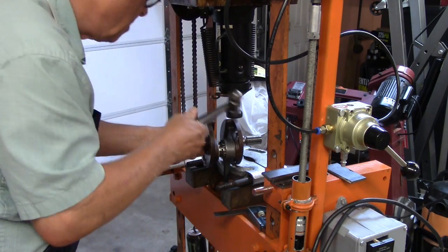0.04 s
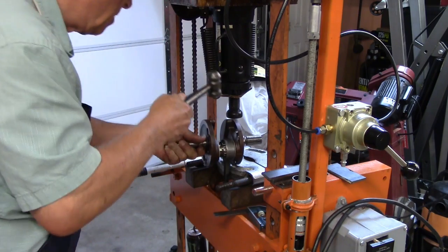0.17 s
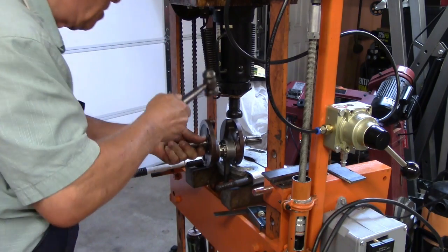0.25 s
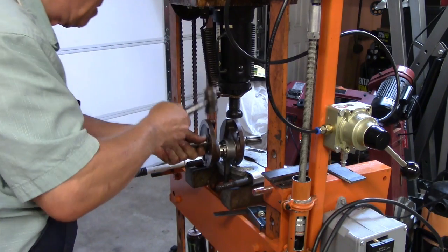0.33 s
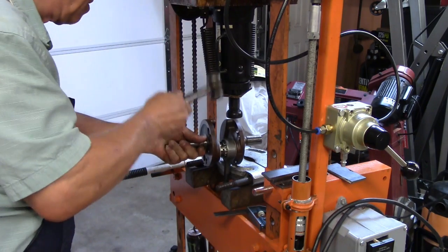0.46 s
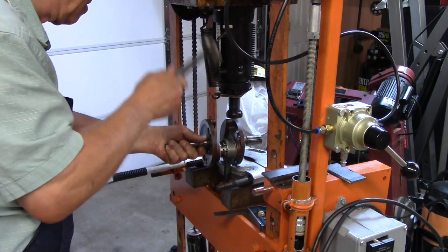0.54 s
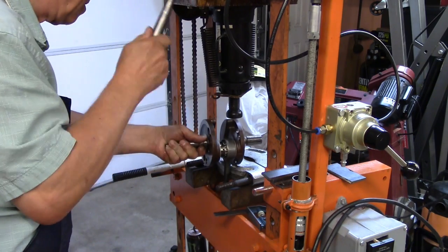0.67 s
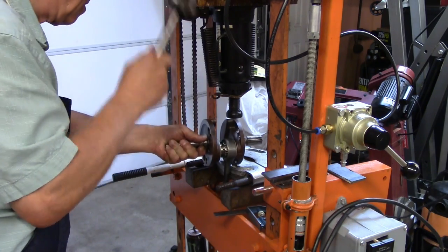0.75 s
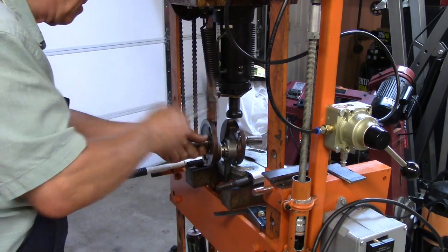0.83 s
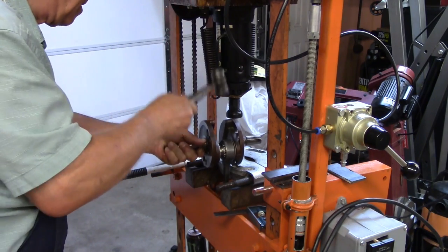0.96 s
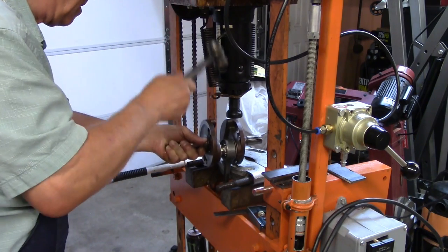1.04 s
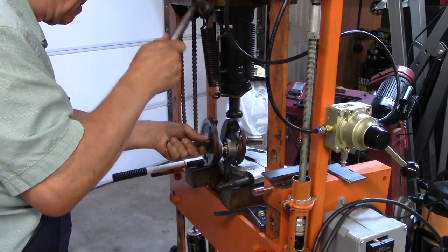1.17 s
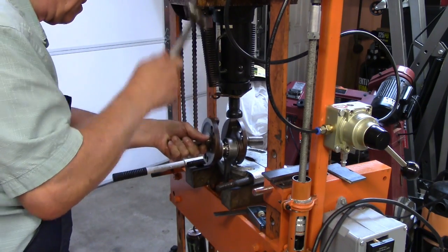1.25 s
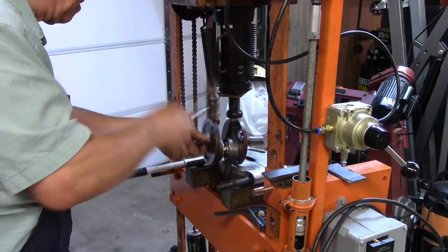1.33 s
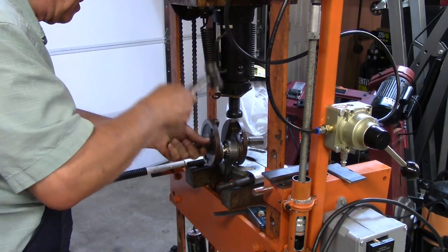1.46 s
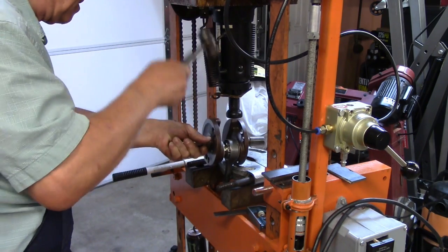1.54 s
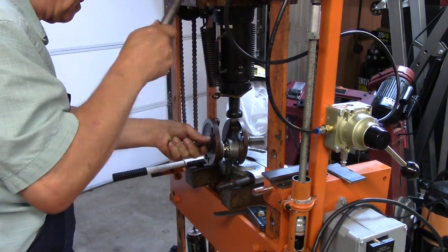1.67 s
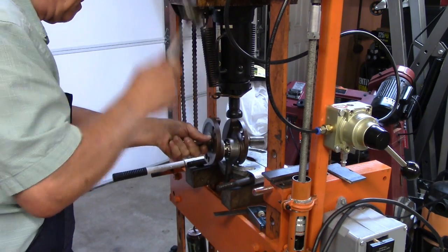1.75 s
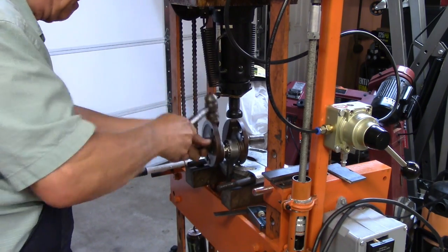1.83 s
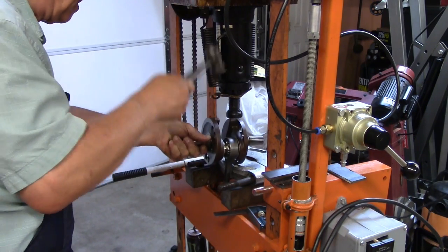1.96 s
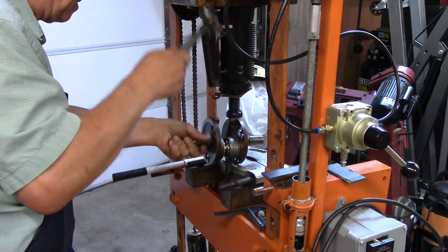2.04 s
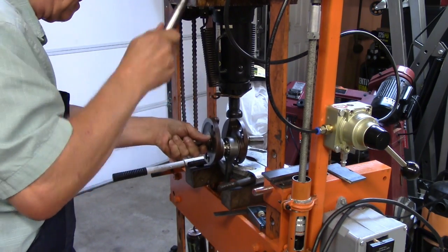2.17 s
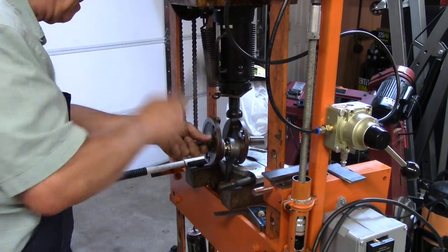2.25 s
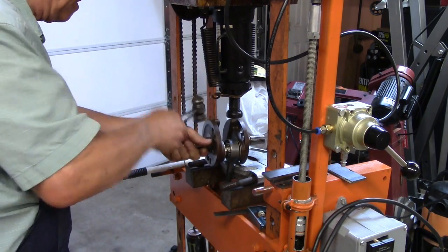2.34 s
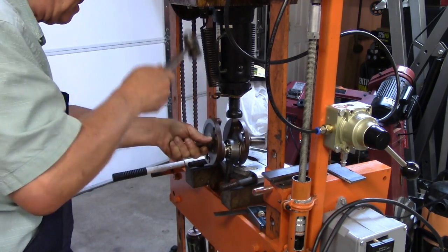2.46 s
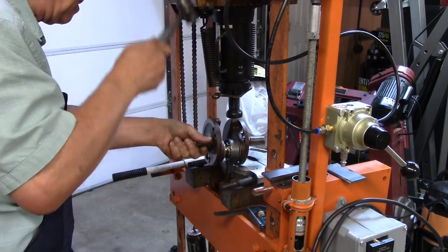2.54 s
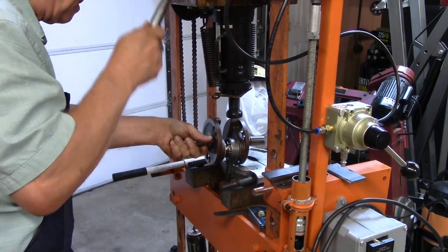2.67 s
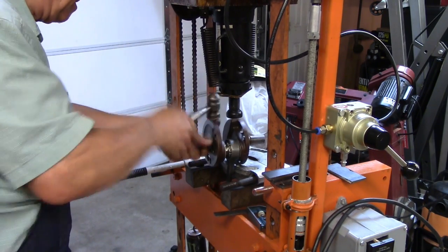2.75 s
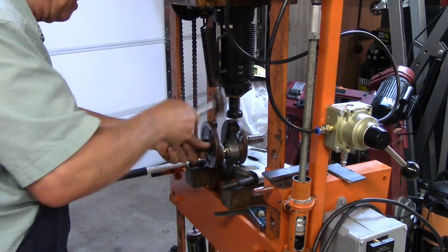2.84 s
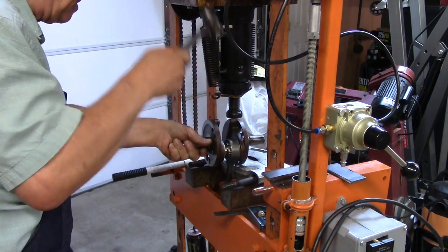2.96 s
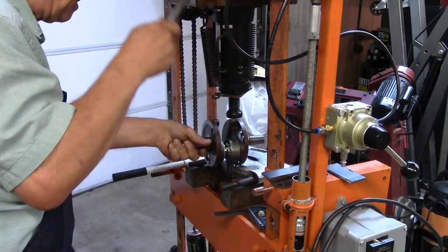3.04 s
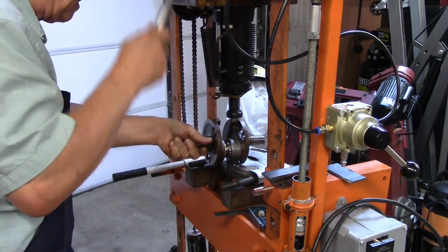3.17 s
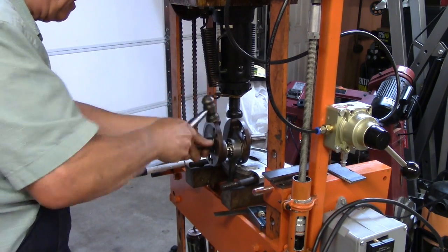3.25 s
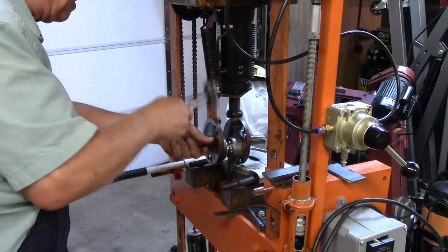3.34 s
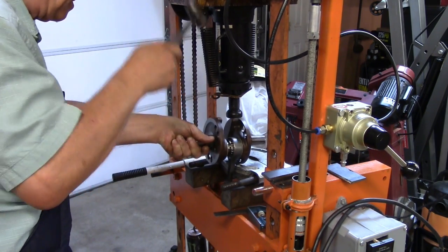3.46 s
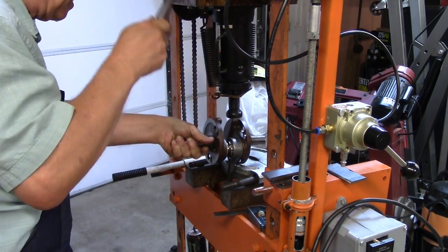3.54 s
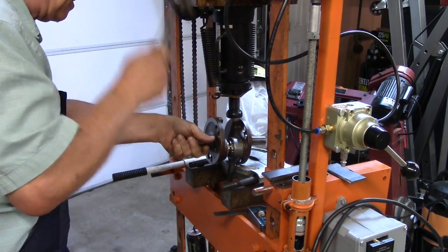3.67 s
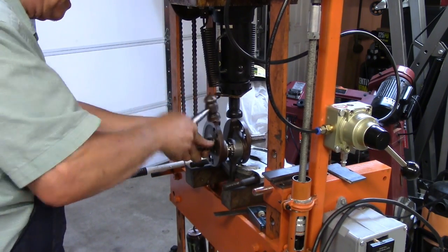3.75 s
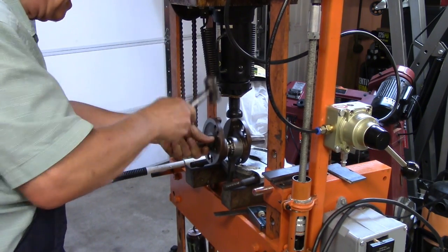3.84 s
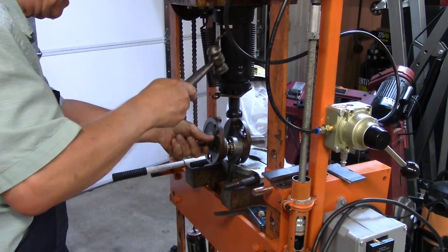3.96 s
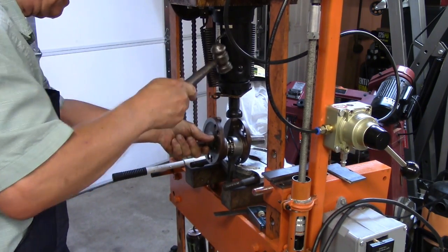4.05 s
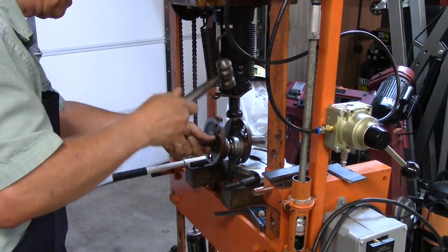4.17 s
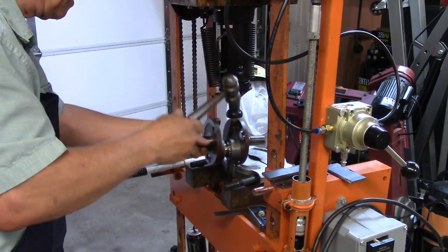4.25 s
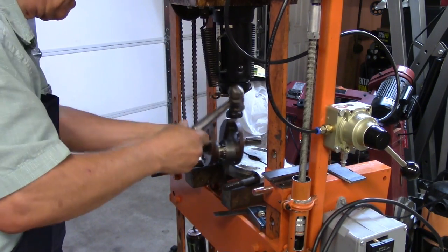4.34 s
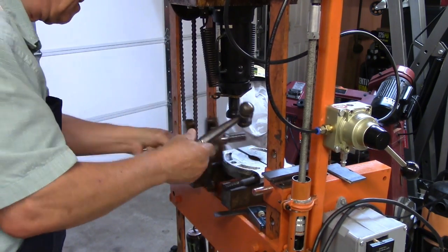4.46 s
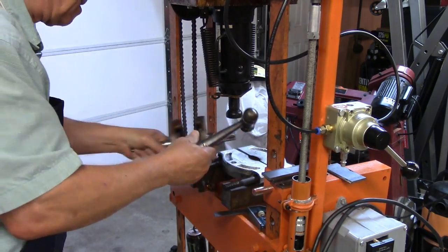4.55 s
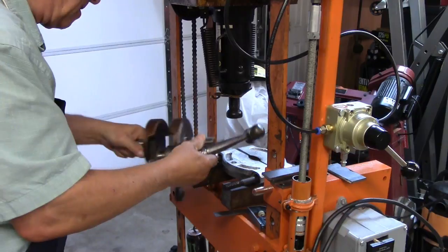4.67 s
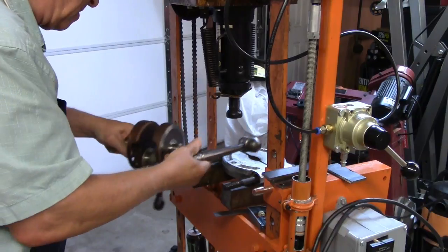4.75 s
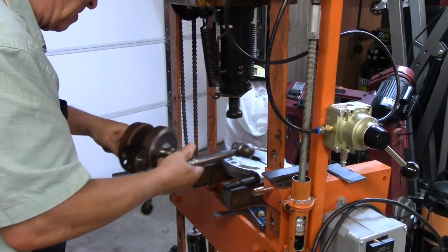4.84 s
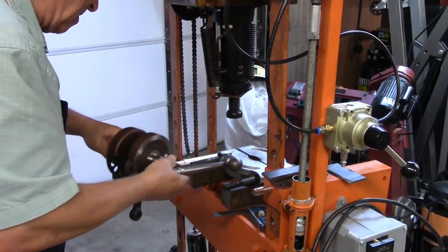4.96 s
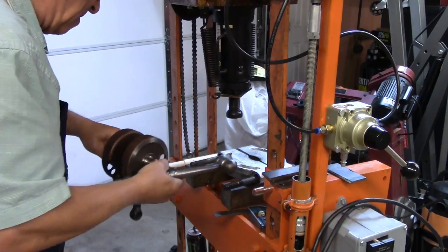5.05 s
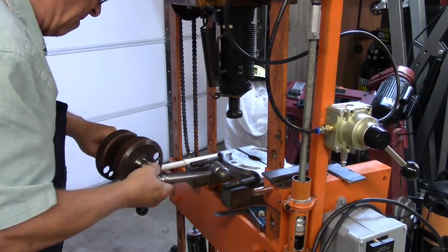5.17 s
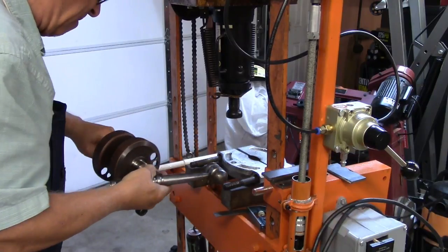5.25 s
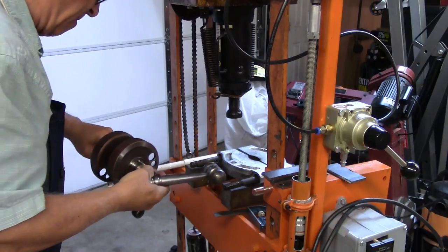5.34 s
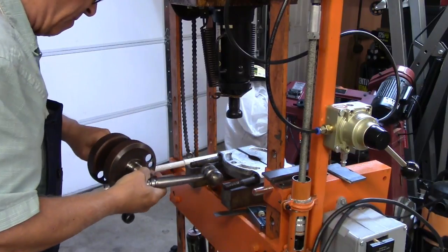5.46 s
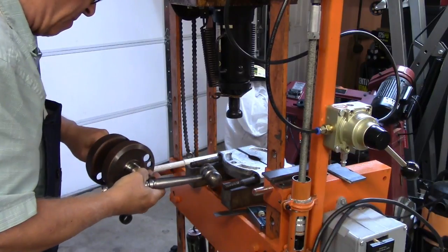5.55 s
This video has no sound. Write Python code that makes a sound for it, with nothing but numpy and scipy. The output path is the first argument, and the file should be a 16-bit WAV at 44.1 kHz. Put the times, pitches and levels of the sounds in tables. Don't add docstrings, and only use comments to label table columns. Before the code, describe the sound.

A steady, dull rush of fan air with a low motor hum fills a hard-walled workshop throughout. Faint ticks and soft slides of steel and cloth come before the hammering. At about 0.45 s a steel hammer lightly taps a clamped steel flywheel, which seats with a small ring. Seven hard blows follow at roughly 0.93, 1.42, 1.9, 2.37, 2.85, 3.33 and 3.81 s. Each is a bright, hard crack with a short, dense metallic ring and a shaking room wash lasting about half a second; the tone shifts slightly, some blows brighter and harder, others rounder. The close microphone clips on every hard attack, then the level is held down for about a fifth of a second before the room returns. From 4.6 to 4.8 s the freed part scrapes softly, and at 5 s it clinks quietly on a steel table, leaving fan and hum.

```python
import sys
import numpy as np
from scipy import signal
from scipy.io import wavfile
from scipy.ndimage import uniform_filter1d

SR = 44100
rng = np.random.default_rng(int(sys.argv[2]) if len(sys.argv) > 2 else 0)


def generate_wav(sig):
    pcm = np.round(np.clip(np.atleast_2d(sig).T, -1, 1) * 32767).astype(np.int16)
    wavfile.write(sys.argv[1], SR, pcm)


def volts_from_db(level):
    exponent = np.asarray(level, float) / 20
    return 10 ** exponent


N = 247004

# pitch in Hz, level in dB per Hz.
FAN_SPECTRUM = [(25, -35), (45, -41), (90, -16), (200, -13), (230, -4.5), (334, -0.5), (385, -5),
                (458, -2.5), (520, -4.5), (860, -10), (3000, -23), (9000, -39), (13000, -47.5),
                (15800, -45)]
# multiple of the shaft speed, level in dB.
HUM_ORDERS = [(1, -58), (2, -58), (3, -54.5), (4, -53), (6, -48.5), (8, -54.5)]
# pitch in Hz, side minus mid in dB.
STEREO_WIDTH = [(60, -10), (150, -19.5), (380, -25.5), (950, -23.5), (2380, -17.5), (5980, -12.5),
                (15000, -6)]
# start in seconds, length in seconds, centre in Hz, width in Hz, level in dB.
SCUFFS = [
    (.405, 0.01, 11000, 7000, -73),
    (.71, 0.017, 12000, 5000, -69),
    (0.812, .03, 5000, 3000, -54),
    (0.888, 0.01083, 3955, 2500, -50),
    (4.582, 0.24, 3730, 900, -52.5),
    (4.83, 0.07, 11000, 6940, -76),
]
# start in seconds, strength in dB, hardness in dB per octave,
# landing spot from 0 (rim) to 1 (web), hammer ring in dB.
BLOWS = [
    (0.448, -13.5, -2, 0.96, -5),
    (0.9274, 6.5, 1.2, .03, 5.5),
    (1.424, 6, 0.6, .08, 6.5),
    (1.9048, 7, 0.82, 0.34, 6),
    (2.3744, 7, 0, 0.55, -9),
    (2.8508, 7, 1.14, 0.08, 2.5),
    (3.3344, 6.5, 0.1, 0.69, -19),
    (3.813, 7.5, 0.3, 0.67, 2),
]
RIM_HZ = [1540, 2190, 2800, 3600, 3665, 3695, 3735, 3790, 3828, 5600, 8000]
WEB_HZ = [4192, 4105, 4137, 5880, 6580, 11290]
HUB_HZ = [3003, 4957, 5240, 5290, 5510, 8472, 8505]
SHAFT_HZ = [11690, 13627, 13634]
HEAD_HZ = [11502, 12600, 13506]
# level in dB, time to fall 60 dB in seconds.
RIM_MODES = [(-17, 0.1), (-2, 0.09), (2, 0.11), (7, 0.065), (0, 0.16), (5, 0.13), (4, 0.2), (4.5, 0.16),
             (2, 0.12), (-16, 0.05), (-13, 0.26)]
WEB_MODES = [(0, 0.15), (-2.5, 0.37), (-3, 0.34), (-8, .15), (-12, 0.15), (-26, 0.26)]
HUB_MODES = [(-3, 0.4), (-7, 0.58), (-5, 0.27), (-9, 0.15), (-13, .1), (-3, 0.3), (-13, 0.29)]
SHAFT_MODES = [(-50, .7), (-31, 1.5), (-50, 0.8)]
HEAD_MODES = [(-7.5, 0.24), (-19, 0.2), (-15, 0.2)]
# best spot from 0 to 1, level there in dB, dB lost a whole span away.
FAMILY_SPOTS = [
    (.05, 2.5, 12),
    (1.0, 8, 19),
    (.45, 6, 79),
    (.5, -1, 40),
]
# pitch in Hz, level in dB per Hz.
CRACK_SPECTRUM = [(60, -57.5), (150, -35), (260, -18), (500, -18.5), (1000, -10.5), (1600, -6.5),
                  (2300, -7.5), (3700, -3), (4550, -6.5), (5500, -2), (7500, -9.5), (11800, -13),
                  (15500, -24.5)]
SEAT_HZ = [1535, 1740, 4957, 1830, 2780, 4120, 5240, 6590, 11250]
# level in dB, time to fall 60 dB in seconds.
SEAT_MODES = [(-21, .15), (-17, 0.12), (-24, .3), (-19, 0.1), (-15, 0.12), (-23, .4), (-20, .24),
              (-19, .16), (-23, .2)]
# pitch in Hz, time to fall 60 dB in seconds.
ROOM_DECAY = [(300, 0.52), (1000, 0.47), (2000, 0.53), (4000, 0.48), (8000, 0.42), (15000, 0.22)]
# delay in seconds, level in dB.
ECHOES = [(.0055, -9), (.0085, -12), (.014, -12), (.021, -15), (.035, -16)]
TABLE_HZ = [1055, 1437, 1534, 1803, 2900, 4124, 5243, 6600, 7989, 8786, 11500]
# level in dB, time to fall 60 dB in seconds.
TABLE_MODES = [(-2, 0.18), (-6, 0.15), (-10, .15), (19, 0.0053), (16, 0.004), (-22, .15), (-10, 0.36),
               (-9, .1), (-15, 0.073), (0, 0.011), (-16, 0.14)]

FAN_DB, HUM_HZ = -38.5, 57.27
RING_DB, CRACK_DB, WASH_DB, THUD_DB = -10, 4, 29.5, -37.5
LOUDEST_DB = 11
FULL_BLOW_DB = 6
CRACK_PER_HARDNESS_DB, CRACK_PER_STRENGTH = 4.5, -.7
CRACK_LOW_HZ = 1400
WASH_PER_STRENGTH = .15
WET_DB = -5
TAP_S, TAP_DB = 4.9801, -33
LIMIT_DB, ATTACK_S, RELEASE_DB_S = -11.5, 0.0026, 306
CEILING = .99
CLIP_LOW_HZ = 1100
EDGE_HZ = 15900


def read(points, hz):
    f, value = np.transpose(points)
    return np.interp(np.log(hz + 1), np.log(f + 1), value)


def evened(x):
    return x / np.sqrt(np.mean(x ** 2) + 1e-20)


def add(mix, s, sound):
    part = mix[round(s * SR):][:len(sound)]
    part += sound[:len(part)]


def low_cut(x, hz):
    return signal.sosfilt(signal.butter(4, hz, "high", fs=SR, output="sos"), x)


def colour(x, points, tilt_db=0):
    hz = abs(np.fft.fftfreq(4096, 1 / SR))
    gain_db = read(points, hz) + tilt_db * np.log2((hz + 100) / 4000)
    log_gain = np.log(volts_from_db(np.maximum(gain_db, -90)))
    taps = np.fft.ifft(np.exp(np.conj(signal.hilbert(log_gain)))).real[:2048]
    return signal.oaconvolve(x, taps / np.linalg.norm(taps), axes=-1)[:len(x)]


def fan():
    frames, hz = N // 512 + 5, np.fft.rfftfreq(2048, 1 / SR)
    a, b, c, d, patches = rng.standard_normal((frames, 1025, 5)).T
    patches = uniform_filter1d(patches, 20, 0)
    patches = evened(uniform_filter1d(patches, 6, 1))
    side_gain = volts_from_db(read(STEREO_WIDTH, hz) + 4.0)[:, None]
    z = np.array([a + 1j * b, (c + 1j * d) * side_gain])
    z = z * volts_from_db(read(FAN_SPECTRUM, hz)[:, None] + 0.81 * patches)
    x = signal.istft(z, nperseg=2048, noverlap=1536)[1][:, :N]
    return volts_from_db(FAN_DB) * x / np.std(x[0])


def hum():
    t, out = np.arange(N) / SR, np.zeros(N)
    for order, db in HUM_ORDERS:
        knots = rng.standard_normal((N // 3000 + 2, 2))
        knot_s = np.arange(len(knots)) * 3000 / SR
        swell, slip = (np.interp(t, knot_s, k) for k in knots.T)
        tone = np.sin(2 * np.pi * order * HUM_HZ * t + 0.19 * order * slip)
        out += volts_from_db(db + 4.0 * swell) * np.sqrt(2) * tone
    return out


def scuff(length, hz, width, db):
    x = rng.standard_normal(round(length * SR))
    edges = [hz - width / 2, min(hz + width / 2, SR / 2.2)]
    band = signal.butter(2, edges, "band", fs=SR, output="sos")
    return volts_from_db(db) * evened(signal.sosfilt(band, x)) * np.hanning(len(x))


def bank(hzs, modes):
    t = np.arange(round(1.1 * SR)) / SR
    db, t60 = np.transpose(modes)[:, :, None]
    return volts_from_db(db - 60 * t / t60) * np.sin(2 * np.pi * np.array(hzs)[:, None] * t)


def ring(rows):
    signs = rng.choice([-1, 1], len(rows))
    scatter = volts_from_db(0.57 * rng.standard_normal(len(rows)))
    return (signs * scatter) @ rows


def landing(spot):
    return [db - loss_db * (spot - best) ** 2 for best, db, loss_db in FAMILY_SPOTS]


def blow(banks, strength_db, hardness_db, spot, head_db):
    t = np.arange(SR // 20) / SR
    out = np.zeros(banks[0].shape[1])
    for db, rows in zip([*landing(spot), head_db], banks):
        out += volts_from_db(RING_DB + min(db, LOUDEST_DB)) * ring(rows)
    crack = rng.standard_normal(len(t)) * np.exp(-t / .003)
    crack = low_cut(colour(crack, CRACK_SPECTRUM, hardness_db - .6), CRACK_LOW_HZ)
    crack_db = CRACK_DB + CRACK_PER_HARDNESS_DB * hardness_db
    crack_db += CRACK_PER_STRENGTH * (strength_db - FULL_BLOW_DB)
    add(out, 0, volts_from_db(crack_db) * crack)
    add(out, 0, volts_from_db(THUD_DB) * np.sin(2 * np.pi * 180 * t) * np.exp(-t / 0.0016))
    return volts_from_db(strength_db) * out


def seat():
    return ring(bank(SEAT_HZ, SEAT_MODES))


def diffuse():
    hz, t, z = signal.stft(rng.standard_normal((2, SR * 2 // 3)), SR, nperseg=256)
    z = z * volts_from_db(-60 * t / read(ROOM_DECAY, hz)[:, None])
    z[1] *= volts_from_db(read(STEREO_WIDTH, hz))[:, None]
    tail = signal.istft(z, SR, nperseg=256)[1]
    tail = tail * np.clip(np.arange(tail.shape[1]) / SR / 0.0033 - .3, 0, 1)
    return tail / np.linalg.norm(tail[0])


def wash(hardness_db):
    return volts_from_db(WASH_DB) * np.array([colour(port, CRACK_SPECTRUM, hardness_db) for port in diffuse()])


def room(x):
    tail = volts_from_db(WET_DB) * diffuse()
    tail[0, 0] = 1
    for s, db in ECHOES:
        tail[0, round(s * SR)] += volts_from_db(db)
    return signal.fftconvolve(x[None], tail, axes=1)[:, :N]


def tap():
    out = ring(bank(TABLE_HZ, TABLE_MODES))
    click = 3.5 * rng.standard_normal(400) * np.exp(-np.arange(400) / SR / 0.00068)
    add(out, 0, colour(click, CRACK_SPECTRUM, -5.5))
    return volts_from_db(TAP_DB) * out


def scene():
    work, shaken = np.zeros(N), np.zeros((2, N))
    for s, *how in SCUFFS:
        add(work, s, scuff(*how))
    families = [(RIM_HZ, RIM_MODES), (WEB_HZ, WEB_MODES), (HUB_HZ, HUB_MODES),
                (SHAFT_HZ, SHAFT_MODES), (HEAD_HZ, HEAD_MODES)]
    banks = [bank(*family) for family in families]
    for s, strength_db, hardness_db, *how in BLOWS:
        add(work, s, blow(banks, strength_db, hardness_db, *how))
        wash_db = strength_db + WASH_PER_STRENGTH * (strength_db - FULL_BLOW_DB)
        add(shaken.T, s, volts_from_db(wash_db) * wash(hardness_db).T)
    add(work, BLOWS[0][0], seat())
    add(work, TAP_S, tap())
    add(shaken.T, TAP_S, volts_from_db(TAP_DB - 10.0) * wash(-3.1).T)
    mid, side = room(work) + shaken + fan()
    mid = mid + hum()
    return np.array([mid + side, mid - side])


def limiter(x):
    keep = np.exp(-1 / (ATTACK_S * SR))
    smooth = lambda v: signal.lfilter([1 - keep], [1, -keep], v)
    power_db = 10 * np.log10(smooth((x ** 2).mean(0)) + 1e-12)
    fall = np.arange(N) * RELEASE_DB_S / SR
    held_db = np.maximum.accumulate(power_db + fall) - fall
    over_db = np.maximum(held_db - LIMIT_DB, 0)
    ducked = x / volts_from_db(smooth(over_db))
    overload = low_cut(np.clip(ducked, -CEILING, CEILING) - ducked, CLIP_LOW_HZ)
    return np.clip(ducked + overload, -CEILING, CEILING)


def top_cut(x):
    return signal.sosfilt(signal.butter(12, 15910, fs=SR, output="sos"), x)


def record(dry):
    limited = limiter(dry)
    mix = signal.oaconvolve(limited, signal.firwin(255, EDGE_HZ, fs=SR)[None], "same")
    return top_cut(mix)


dry = scene()
out = record(dry)
generate_wav(out)
```